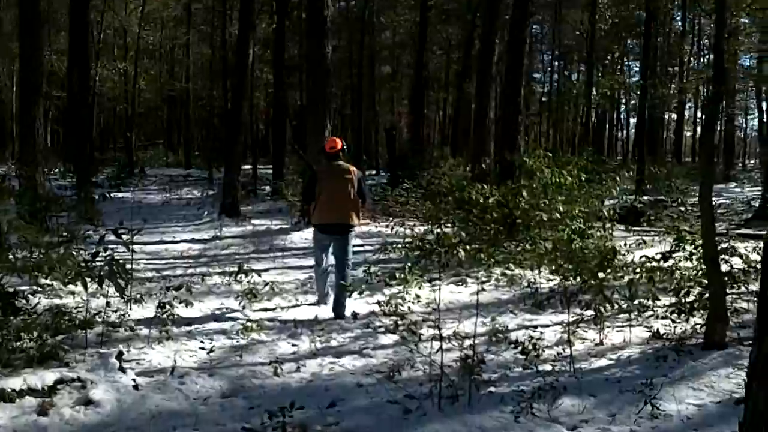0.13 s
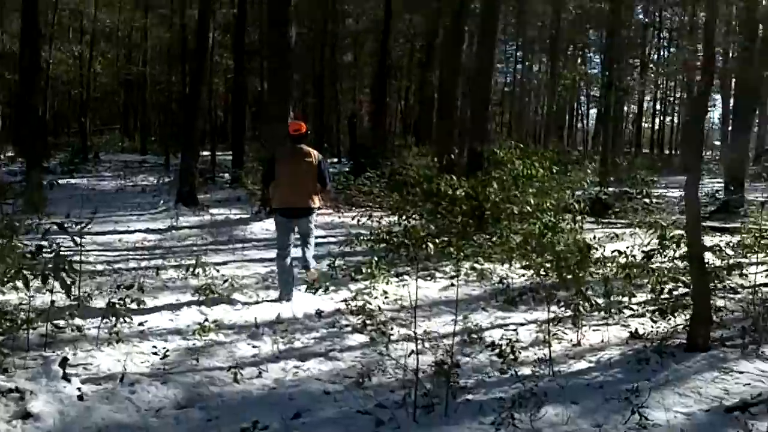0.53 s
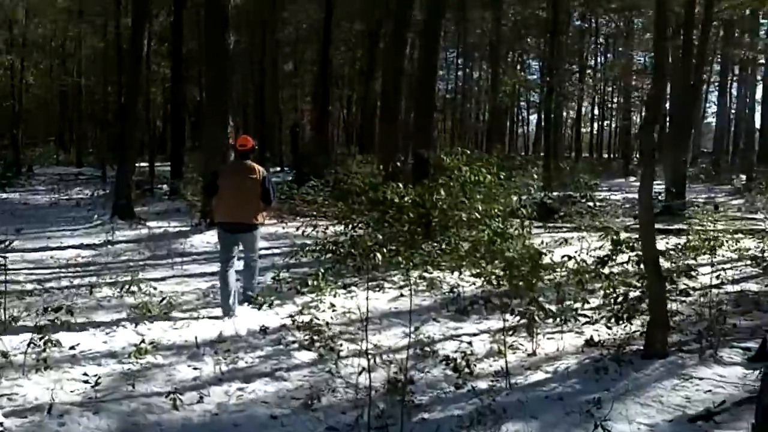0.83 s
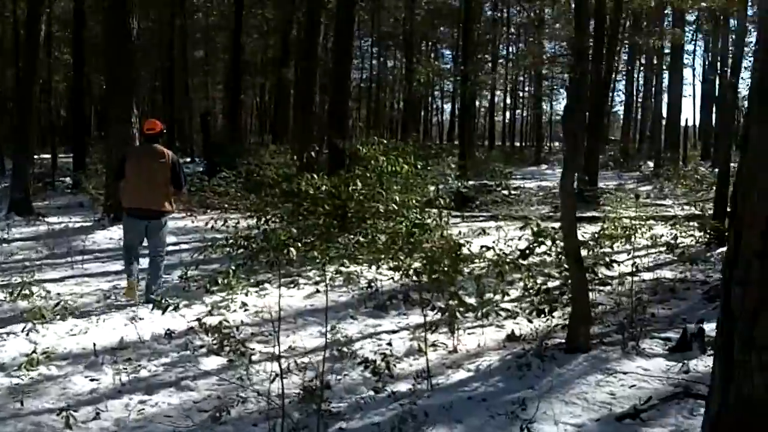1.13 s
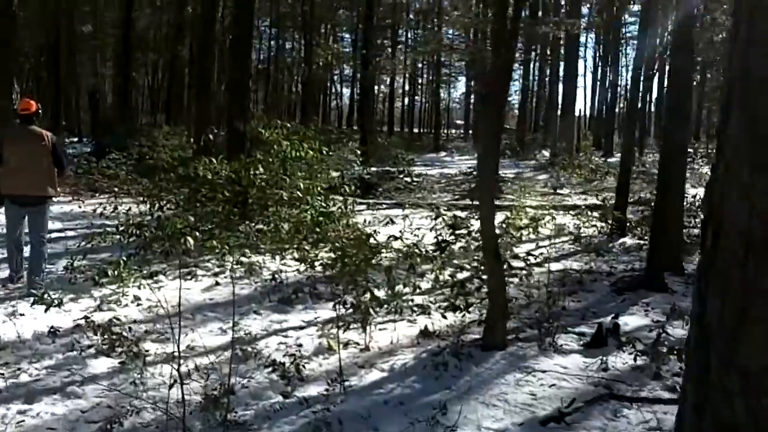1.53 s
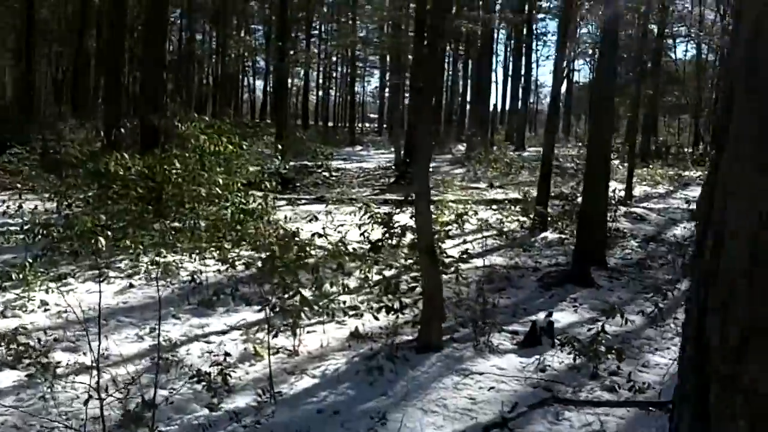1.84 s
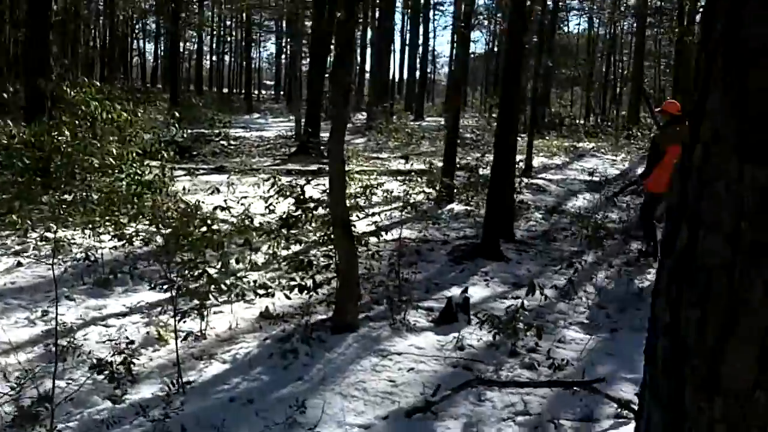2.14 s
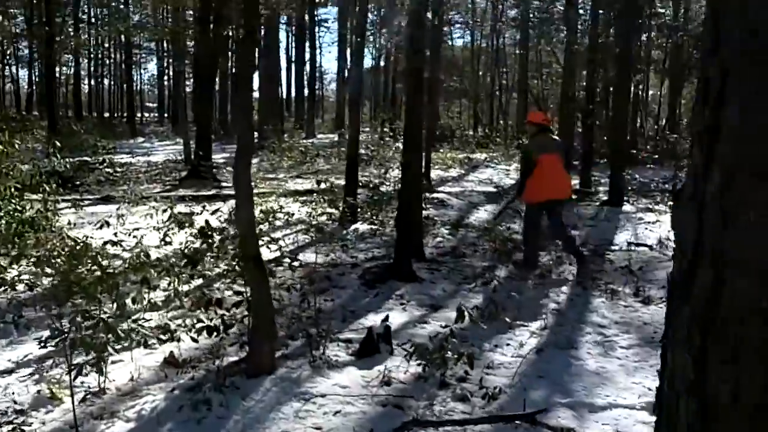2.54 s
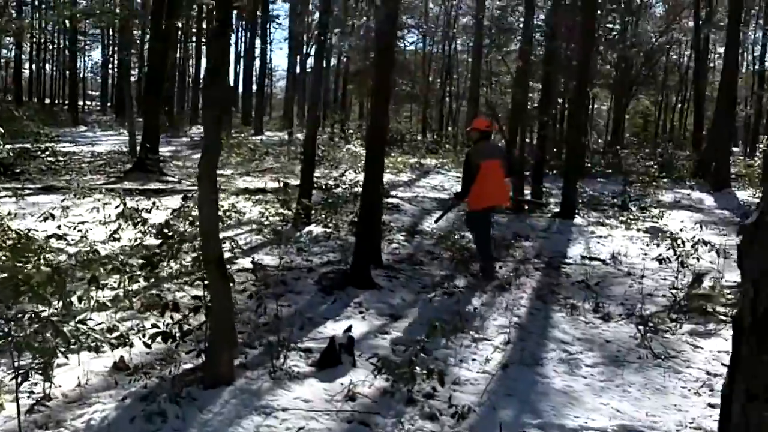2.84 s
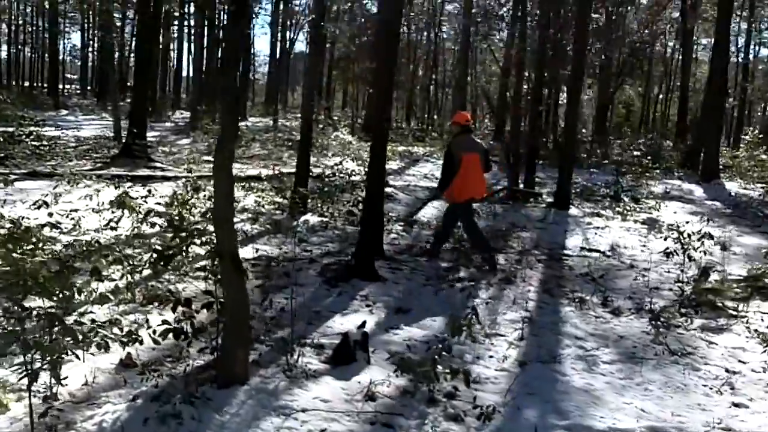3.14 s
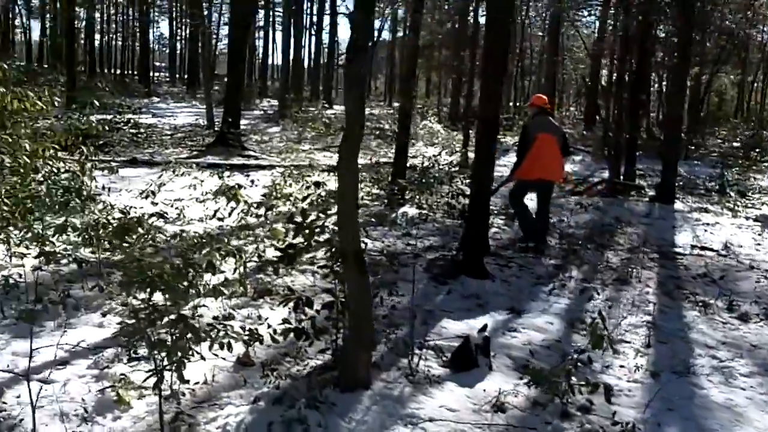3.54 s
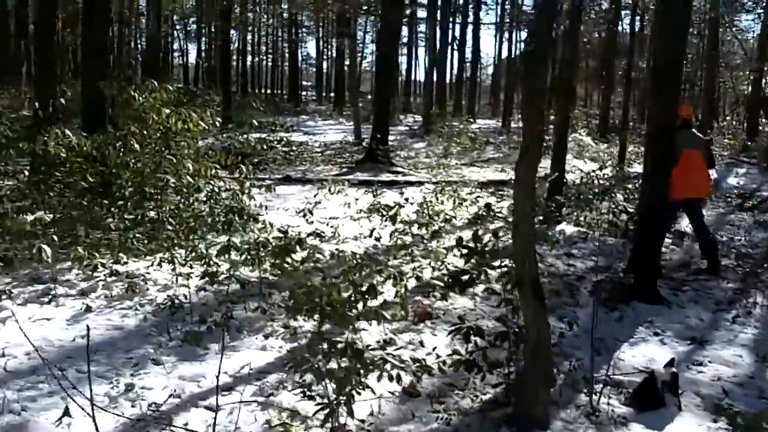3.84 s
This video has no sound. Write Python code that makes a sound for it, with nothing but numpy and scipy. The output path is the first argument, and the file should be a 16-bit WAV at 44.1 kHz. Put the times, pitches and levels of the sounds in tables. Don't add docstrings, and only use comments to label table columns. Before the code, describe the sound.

Boots crunch steadily through an icy snow crust, about three steps every two seconds, with splinters snapping and one dry twig cracking late; quiet pine wood, small handheld microphone, faint wind buffets.

```python
import sys
import numpy as np
from scipy import signal
from scipy.fft import rfft, irfft
from scipy.io import wavfile
from scipy.ndimage import uniform_filter1d

SR = 44100
rng = np.random.default_rng(int(sys.argv[2]) if len(sys.argv) > 2 else 0)


def boost(x):
    u = np.asarray(x, float) / 20
    return 10 ** u


def master(y):
    cut = np.clip(np.atleast_2d(y).T, -1, 1)
    pcm = np.round(cut * 32767)
    wavfile.write(sys.argv[1], SR, pcm.astype(np.int16))


N = 176400

# hz, level_db (density per Hz)
CRUST = [(100, 7), (300, 4.5), (900, -1.5), (2000, 0), (4200, 4.5), (6500, 2), (10000, -10), (15000, -23.5)]


def rms_one(x):
    return x / np.sqrt(np.mean(x ** 2) + 1e-20)


def colour(x, points):
    hz, db = np.transpose(points)
    f = np.maximum(np.arange(N // 2 + 1) * SR / N, 1)
    gain = boost(np.interp(np.log(f), np.log(hz), db))
    return rms_one(irfft(rfft(x) * gain, N))


def drift(rate_hz):
    r = np.exp(-2 * np.pi * rate_hz / SR)
    noise = rng.standard_normal(N + SR)
    return rms_one(signal.lfilter([1], [1, -2 * r, r * r], noise)[SR:])


def ring(x, hz, width_hz):
    r = np.exp(-np.pi * width_hz / SR)
    poles = [1, -2 * r * np.cos(2 * np.pi * hz / SR), r * r]
    return signal.lfilter([(1 - r * r) / 2, 0, (r * r - 1) / 2], poles, x)


def registers(x):
    body_hz, sparkle_hz = 2700, 7900
    bands = []
    for hz, kind in [(body_hz, "low"), ([body_hz, sparkle_hz], "band"), (sparkle_hz, "high")]:
        bands.append(rms_one(signal.sosfilt(signal.butter(3, hz, kind, fs=SR, output="sos"), x)))
    return np.array(bands)


def crunch():
    # start_s, length_s, level_db, body_db and sparkle_db (both relative)
    steps = [(0.317, 0.095, -45, -7.5, -6), (0.432, 0.044, -44.5, -6, -8),
             (0.865, 0.0087, -42.5, -13.5, -6), (0.905, 0.089, -41.5, -9.5, -4.5),
             (1.015, 0.058, -42.5, -9, -6), (1.073, 0.16, -49.5, -12.5, 0),
             (1.227, 0.054, -42.5, -11.5, -10), (1.626, .036, -47, -9.5, -3.5),
             (1.695, 0.054, -41.5, -11.5, -6), (1.759, 0.036, -43, -10, -9.5),
             (1.816, 0.07, -46.5, -4.5, -8), (2.269, 0.072, -43, -8.5, -7.5),
             (2.321, 0.16, -46.5, -8.5, -5), (2.893, 0.013, -42, -6.5, -6.5), (2.937, 0.099, -44, -9, -6.5),
             (3.045, 0.062, -47, -6, -7), (3.112, 0.066, -46.5, -7.5, -8.5), (3.2, 0.079, -47, -13.5, -5.5),
             (3.636, 0.11, -45.5, -11.5, -3), (3.72, 0.13, -45.5, -9, -4.5), (3.864, 0.055, -48.5, -12, -3),
             (3.905, 0.11, -52.5, -8.5, -7.5)]
    # start_s, length_s, level_db, body_db and sparkle_db (both relative)
    scuffs = [(0.501, 0.056, -49.5, -8, -10), (0.572, 0.089, -51, -8, -2.5), (0.677, 0.11, -70.5, 0.5, -15),
              (1.29, 0.04, -51, -8.5, -2.5), (1.356, 0.03, -49.5, -7, -3.5), (1.398, 0.2, -57, -6, -6.5),
              (1.911, 0.048, -51.5, -8, -7), (2.011, 0.029, -54, -7, -28), (2.092, 0.017, -55.5, -3, -14),
              (2.146, 0.05, -52, -6.5, -7), (2.209, 0.05, -53, -19, 1), (2.511, 0.045, -48, -3.5, -10),
              (2.574, 0.034, -51, -12, -5), (2.788, 0.012, -47, -10, -14), (3.275, 0.087, -52.5, -12, -8.5),
              (3.452, 0.041, -48.5, -7.5, -8), (3.517, 0.056, -52.5, -5, -5),
              (3.608, 0.0067, -45.5, -7, -1)]
    attack_s, rise_per_s, release_s = 0.00061, 2.5, 0.024
    sag_db, swell_db_per_s, arch_db = -2.5, 34.5, 2
    power = cracks()
    for s, length, db, body_db, sparkle_db in steps + scuffs:
        i = int(s * SR)
        u = np.arange(min(SR // 2, N - i)) / SR
        progress = np.clip(u / length, 0, 1)
        swell = boost((sag_db + swell_db_per_s * length) * progress + arch_db * np.sin(np.pi * progress))
        attack = np.clip(u / (attack_s + rise_per_s * length ** 2), 0, 1) ** .5
        release = np.exp(-np.maximum(u - length, 0) / release_s)
        levels = boost(db + np.array([[body_db], [0], [sparkle_db]]))
        power[:, i:i + len(u)] += (levels * attack * swell * release) ** 2
    return np.sum(np.sqrt(power) * registers(colour(fractures(), CRUST)), axis=0)


def cracks():
    # start_s, peak_db, body_db (relative)
    plates = [(0.3835, -42, -14), (0.435, -32.5, -6.5), (0.5217, -49, -14), (0.6412, -34.5, -12),
              (0.9078, -45, -10), (0.9193, -45, -12), (0.9414, -38, -10), (0.9714, -33, -11),
              (0.9812, -26.5, -10), (1.035, -39, -6), (1.0673, -29, -17), (1.2366, -49, -15),
              (1.2441, -43, -16), (1.6292, -45, -17), (1.703, -44, -18), (1.7174, -27.5, -18),
              (1.7474, -37, -3), (1.7765, -35, -15), (1.9405, -36, -8), (2.2684, -29, -9),
              (2.3014, -30.5, -0.5), (2.409, -32, -9), (2.4754, -43, -3), (2.5237, -42, -11),
              (2.809, -51, 3), (2.9467, -44, -23), (2.9746, -42, -14), (3.0164, -41, -13), (3.253, -34, -4),
              (3.4585, -44, -10), (3.7085, -32, -15), (3.7414, -37, 2), (3.8298, -30.5, -6),
              (3.8823, -31, -9)]
    # start_s, peak_db, body_db (relative)
    more_plates = [(0.349, -34, -2.5), (1.2984, -33, -5), (1.3034, -43, -4), (1.732, -32, 1), (1.7844, -31, -8),
                   (2.3164, -39, -8), (2.4234, -45, -8), (2.4644, -37, -11), (2.9944, -44, -8),
                   (3.0484, -39, -1), (3.0764, -46, -13), (3.5364, -44, -8), (3.616, -37, -7), (3.6386, -38, -1),
                   (3.7844, -38, -11)]
    t60_s, gain_db, sparkle_db = 0.069, -7.5, -11.5
    power = np.zeros((3, N + SR))
    u = np.arange(SR // 15) / SR
    for s, db, body_db in plates + more_plates:
        i = int(s * SR)
        bands_db = np.array([[body_db], [0], [sparkle_db]])
        power[:, i:i + len(u)] += boost(db + gain_db + bands_db - 60 * u / t60_s) ** 2
    return power[:, :N]


def fractures():
    per_s, size_spread_db = 12000, 2.5
    clump_db, own_clump_db, clumps_hz = 1, 1.1, 37
    pitches = np.geomspace(150, 15000, num=24)
    together, own = drift(clumps_hz), drift(68)
    sizes = boost(size_spread_db * np.minimum(rng.exponential(1, N), 5)) * rng.standard_normal(N)
    born = sizes * (rng.random(N) < per_s / SR)
    share = np.sqrt(pitches) / np.sum(np.sqrt(pitches))
    dealt = rng.choice(len(pitches), N, p=share)
    out = 0
    for k, hz in enumerate(pitches):
        apart = np.roll(own, k // 2 * N // len(pitches))
        clump = boost(clump_db * together + own_clump_db * apart)
        shard = ring(born * clump * (dealt == k) + 1e-18, hz, 0.28 * hz)
        out = out + (-1) ** k * shard / np.sqrt(share[k])
    dust = boost(-0.5) * rng.standard_normal(N) * boost(clump_db * together)
    return rms_one(out) + dust


def snaps():
    # start_s, peak_db, ring_hz, body_db and sparkle_db (both relative)
    splinters = [(0.8639, -37, 4560, 0, -13), (1.287, -22.5, 4670, -20, -15), (1.685, -40, 4550, -9, -10),
                 (1.7284, -28, 3430, -21, -22), (2.0262, -39.5, 3920, -15, -18),
                 (2.0978, -42.5, 3200, -4.5, -16), (2.1816, -43.5, 4100, -8, -6),
                 (2.251, -47.5, 4380, 0.5, 0), (2.8955, -39, 3770, -3.5, -21),
                 (3.068, -39.5, 3870, -22, -20), (3.1213, -37, 3700, -3.5, -4), (3.1634, -42, 3530, 7, -10),
                 (3.5278, -42, 3870, -6.5, 3.5), (3.5328, -43, 4500, -19, 8), (3.5838, -39.5, 4900, -9, 1),
                 (3.6028, -43.5, 3630, -1, -4), (3.6115, -38.5, 4600, -4.5, 0),
                 (3.9279, -35, 3680, -10.5, -8), (3.972, -41.5, 4720, -8, -13)]
    attack_s, hold_s, t60_s = 0.00034, 0.00093, 0.016
    body, bite, sparkle = registers(colour(rng.standard_normal(N), CRUST))
    body = signal.sosfilt(signal.butter(2, 450, "high", fs=SR, output="sos"), body)
    u = np.arange(SR // 40) / SR
    burst = np.minimum(u / attack_s, 1) * boost(-60 * np.maximum(u - hold_s, 0) / t60_s)
    click = 4.1 * (u == u[4])
    out = np.zeros(N + SR)
    for s, db, hz, body_db, sparkle_db in splinters:
        at = slice(int(s * SR), int(s * SR) + len(u))
        core = ring(ring(burst * bite[at] + click, hz, 410), hz, 1700)
        edges = burst * (boost(body_db) * body[at] + boost(sparkle_db) * sparkle[at] + 0.53 * bite[at])
        out[at] += boost(db + 1.5) * (core / np.abs(core).max() + edges)
    return out[:N]


def twig():
    start_s, level_db = 2.7024, -19
    ring_hz, width_hz, ring_db = 730, 310, 9
    click = np.arange(N) == int(start_s * SR)
    pulse = boost(level_db) * signal.lfilter([1], [1, -.5], click)
    return pulse - boost(ring_db) * ring(pulse + 1e-18, ring_hz, width_hz)


def thuds():
    # peak_s, peak_db, pitch_hz
    heels = [(0.873, -40.5, 116), (1.04, -45, 280), (1.128, -48, 120), (1.291, -43, 770), (1.767, -43, 272),
             (1.854, -44.5, 660), (2.315, -36, 130), (2.476, -46.5, 360), (2.896, -47, 346),
             (3.051, -45, 534), (3.256, -43.5, 560), (3.479, -47, 447), (3.744, -37, 146),
             (3.789, -40.5, 457)]
    # peak_s, peak_db, pitch_hz
    pockets = [(0.37, -41.5, 333), (0.386, -44, 410), (1.127, -51, 334), (1.866, -48, 453),
               (2.47, -50.5, 380), (0.439, -52.5, 199), (0.915, -51, 444), (0.978, -61, 200),
               (1.024, -48, 417), (1.07, -44.5, 814), (1.716, -53, 513), (1.833, -49.5, 400),
               (2.3, -47, 413), (2.54, -49, 200), (3.131, -52, 250), (3.162, -52, 273), (3.263, -48, 290),
               (3.807, -52, 510)]
    heel_cycles, pocket_cycles = 1.6, 4
    push_s, lead_s, gain_db = 0.016, .005, 3.5
    rows = [(*row, heel_cycles) for row in heels] + [(*row, pocket_cycles) for row in pockets]
    u = np.arange(SR // 5) / SR
    push = (2.0 + rng.standard_normal((len(rows), len(u)))) * u * np.exp(-u / push_s * 4)
    out = np.zeros(N + SR)
    for (s, db, hz, cycles), drive in zip(rows, push):
        tone = ring(ring(drive, hz, hz / cycles), hz, 2 * hz)
        i = int((s - lead_s) * SR)
        out[i:i + len(u)] += boost(db + gain_db) * tone / np.abs(tone).max()
    return out[:N]


def trunks(x):
    echo_db, t60_s, delay_s = -16.5, 0.3, .006
    u = np.arange(SR // 4) / SR
    tail = rng.standard_normal(len(u)) * boost(-60 * u / t60_s) * (u > delay_s)
    return boost(echo_db) * signal.fftconvolve(x, tail / np.sqrt(np.sum(tail ** 2)))[:N]


def hush():
    # hz, level_db (density per Hz)
    air = [(115, 9), (220, 2), (600, 1.5), (1500, 0.5), (4200, 3), (7000, 3), (14000, -11.5)]
    flutter_db = 2 * drift(5)
    grain = rng.standard_normal(N) + 0.77 * fractures()
    return boost(-55 + flutter_db) * colour(grain, [(50, -1.4)] + list(air))


def wind():
    # hz, level_db (density per Hz)
    rumble = [(7.1, -80), (12, 20.5), (22, -10), (38, 2), (177, -15), (300, -32), (390, -35), (660, -120)]
    # peak_s, peak_db, pitch_hz
    gusts = [(0.402, -28.5, 27.2), (0.527, -40.5, 23.8), (0.738, -39, 24.4), (0.801, -41.5, 37.2),
             (1.059, -34, 27.3), (1.156, -36.5, 50), (1.206, -32.5, 31), (1.497, -40.5, 27.8),
             (1.581, -39, 30.4), (1.722, -48, 35.6), (1.884, -36.5, 24.6), (2.226, -42.5, 45.3),
             (2.543, -37, 25.4), (3.19, -39.5, 27.6), (3.318, -45, 26.8), (3.485, -40.5, 23.5),
             (3.665, -33, 36), (3.897, -40.5, 39.3), (3.947, -38.5, 26.6), (0.407, -35.5, 62),
             (0.845, -43, 60), (1.285, -41.5, 60), (1.324, -42, 69.4), (2.937, -42, 95), (3.059, -45, 69),
             (3.11, -40, 50), (3.139, -46, 60.3), (3.255, -45.5, 45)]
    level_db, gust_cycles = -51, 0.64
    noise = colour(rng.standard_normal(N), [(5, -49)] + list(rumble) + [(900, -14)])
    low = signal.sosfilt(signal.butter(2, 350, fs=SR, output="sos"), noise)
    lumps_db = 2.5 * drift(8)
    out = boost(level_db + lumps_db) * rms_one(low)
    u = np.arange(-SR // 20, SR // 20) / SR
    for (s, db, hz), turn in zip(gusts, rng.random(len(gusts))):
        i = int(s * SR) - SR // 20
        bump = np.exp(-(u * hz / gust_cycles) ** 2)
        out[i:i + len(u)] += boost(db) * bump * np.cos(2 * np.pi * (hz * u + turn))
    return out


def scene():
    near = crunch() + snaps() + twig() + thuds()
    return (near + trunks(near) + hush() + wind())[None]


def low_pass(x):
    return signal.sosfilt(signal.butter(12, 16440, fs=SR, output="sos"), x)


def record(dry):
    # centre_hz, width_hz, depth_db
    notches = [(2711, 1460, -42), (5484, 640, -85), (7907, 6870, -60), (10990, 560, -54), (12300, 760, -8)]
    start_s, cutoff_hz = .34966, 15350
    leak_db, leak_jump = -17, 6.0
    x = dry
    for hz, width, depth_db in notches:
        c = 2 * np.cos(2 * np.pi * hz / SR)
        pole = np.exp(-np.pi * width / SR)
        zero = np.exp(-np.pi * width * boost(depth_db) / SR)
        gain = (1 + pole ** 2) / (1 + zero ** 2)
        x = signal.lfilter(np.array([1, -c * zero, zero ** 2]) * gain, [1, -c * pole, pole ** 2], x)
    top, over = (signal.sosfilt(signal.ellip(10, .5, 60, cutoff_hz, kind, fs=SR, output="sos"), x)
                 for kind in ("low", "high"))
    sudden = uniform_filter1d(over ** 2, size=130) > leak_jump * uniform_filter1d(over ** 2, size=2600)
    top = top + boost(leak_db) * over * uniform_filter1d(1. * sudden, size=200)
    return low_pass(top * (np.arange(N) >= start_s * SR))


dry = scene()
out = record(dry)
master(out)
```